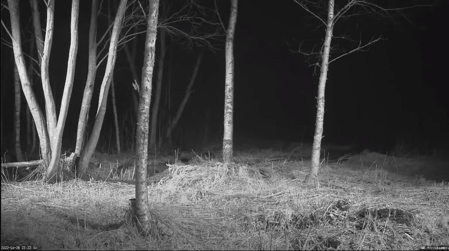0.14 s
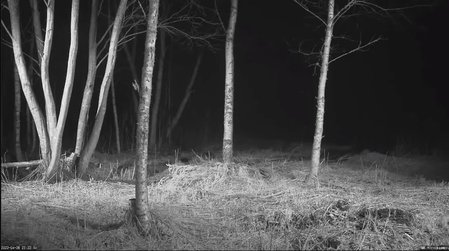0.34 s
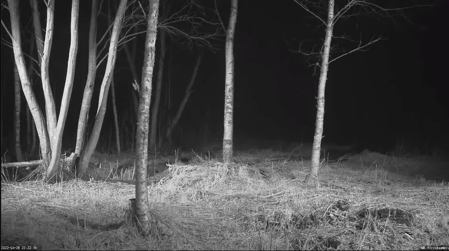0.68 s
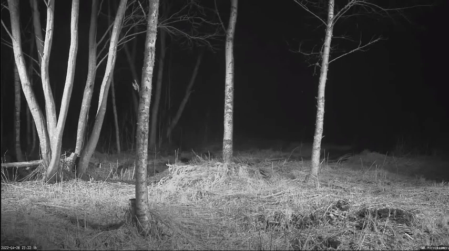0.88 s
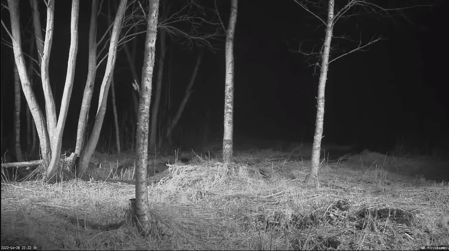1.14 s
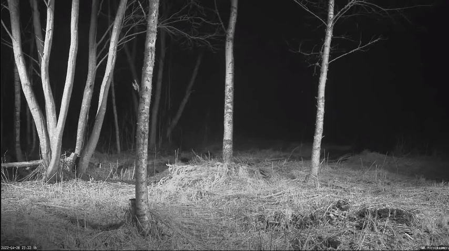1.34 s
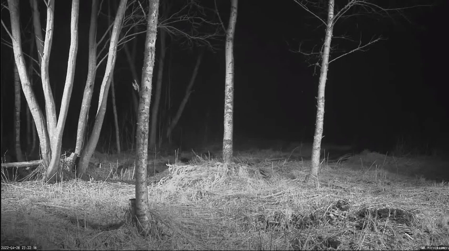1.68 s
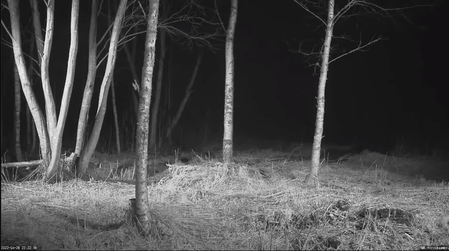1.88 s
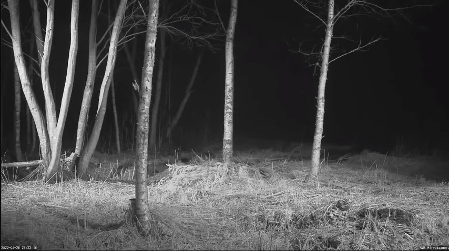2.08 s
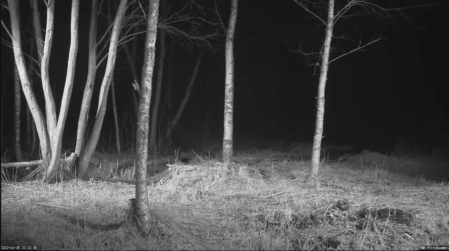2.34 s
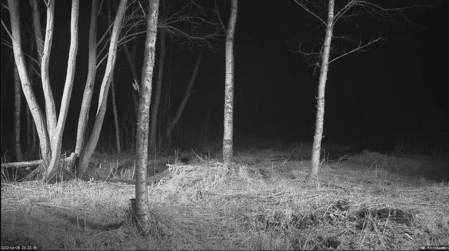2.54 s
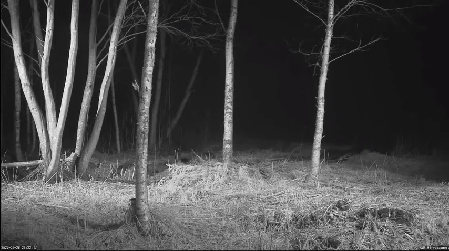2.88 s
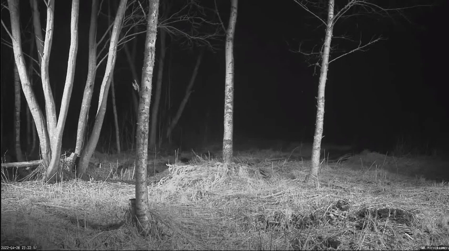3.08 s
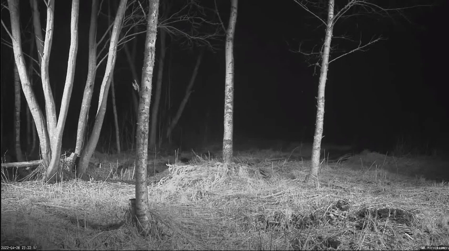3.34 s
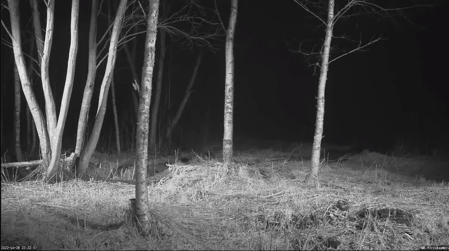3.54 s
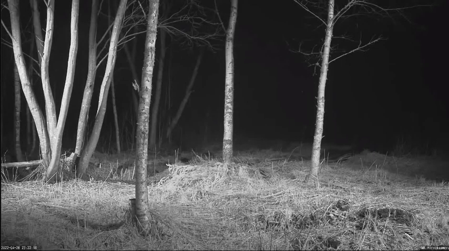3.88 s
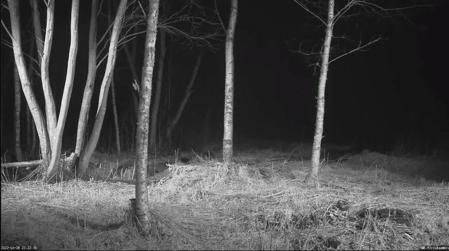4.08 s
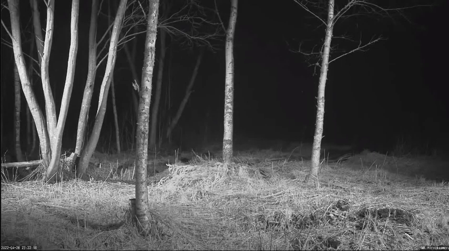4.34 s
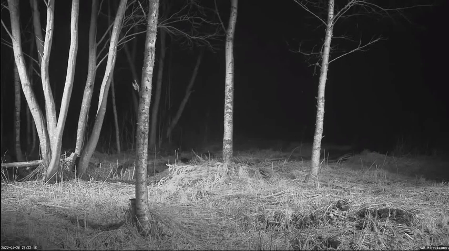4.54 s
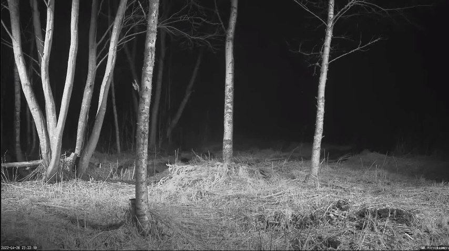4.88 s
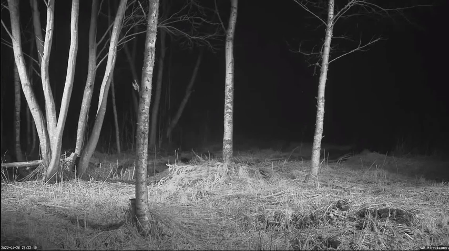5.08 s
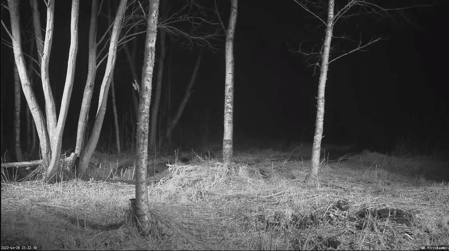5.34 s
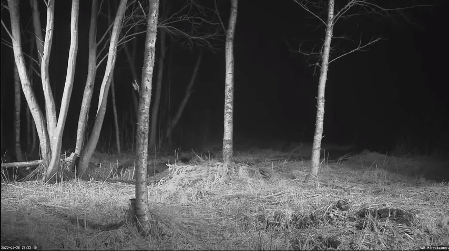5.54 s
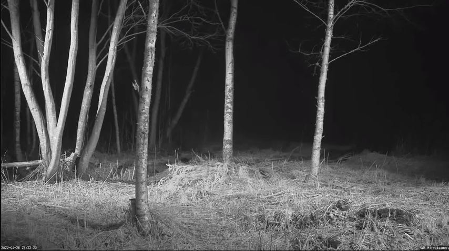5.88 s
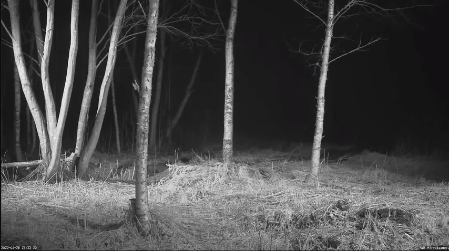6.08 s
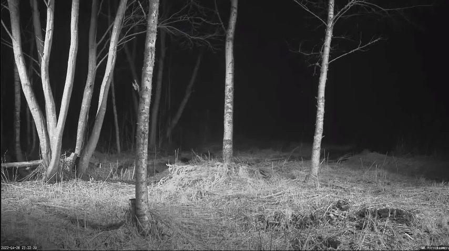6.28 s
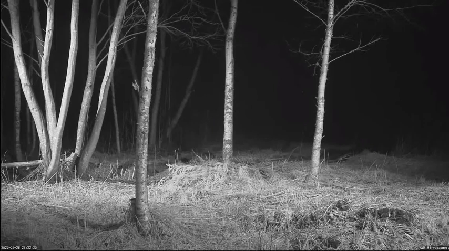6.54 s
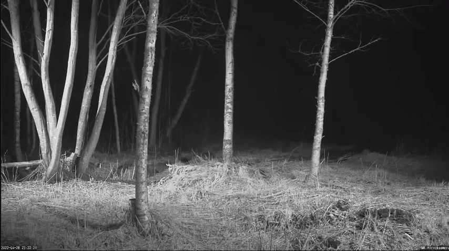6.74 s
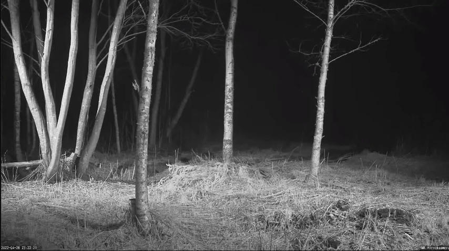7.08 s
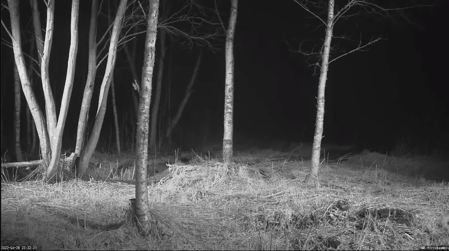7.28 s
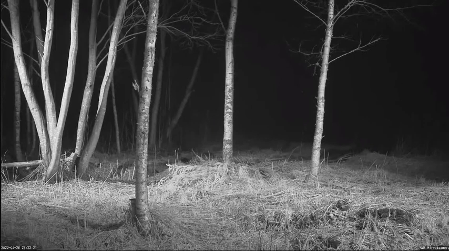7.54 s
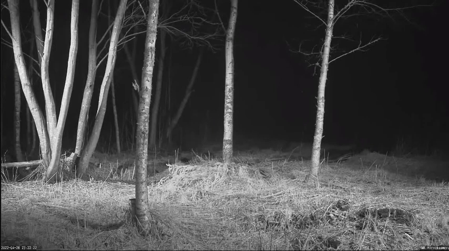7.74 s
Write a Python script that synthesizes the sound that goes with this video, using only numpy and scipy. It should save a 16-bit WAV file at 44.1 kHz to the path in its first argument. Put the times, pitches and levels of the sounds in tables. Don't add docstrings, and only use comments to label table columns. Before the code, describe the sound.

A wolf pack yips, yelps and barks excitedly some way off in a night wood, calls ringing off the trunks over faint hiss.

```python
import sys
import numpy as np
from scipy import signal
from scipy.fft import rfft, irfft, next_fast_len
from scipy.io import wavfile
from scipy.ndimage import uniform_filter1d

SR = 44100
rng = np.random.default_rng(int(sys.argv[2]) if len(sys.argv) > 2 else 0)


def persist_wave(psi):
    counts = np.round(np.clip(psi, -1, 1) * 32767).astype(np.int16)
    wavfile.write(sys.argv[1], SR, np.atleast_2d(counts).T)


def makeup_ratio(level_db):
    decades = np.asarray(level_db, float) / 20
    return 10 ** decades


N = 348831

# frequency in Hz, density in dB per Hz.
HISS_SPECTRUM = [(20, 5), (60, -4.5), (150, -9.5), (300, -10.5), (1000, -26), (3500, -25.5), (7000, -30),
                 (15500, -33)]
HISS_DB = -59

# time in seconds, level in dB.
CHORUS_LEVEL = [(0.0, -32), (0.11, -35.5), (0.61, -40), (0.9, -42.5), (1.6, -39), (1.78, -34), (2.18, -39),
                (2.359, -41), (2.998, -40.5), (3.441, -35.5), (3.901, -32.5), (5.019, -36), (5.68, -35.5),
                (5.989, -37.5), (6.9, -40.5), (7.4, -43), (7.8, -39), (7.91, -35)]
# frequency in Hz, gain in dB.
CHORUS_COLOUR = [(180, -65), (300, -30), (490, -9.5), (710, -9), (830, -4.5), (1310, 6), (1610, 8),
                 (2010, -12.5), (2690, -41), (3300, -52), (4200, -52), (5200, -62), (7000, -80)]

# frequency in Hz, T60 in seconds.
WOOD_T60 = [(300, 7.25), (1000, 2.85), (1600, 0.66), (2600, 1.78), (3600, 1.1), (6000, 0.89)]
# frequency in Hz, gain in dB.
SHADE = [(2500, 0), (3100, -5), (4300, -10), (5400, -3)]
# delay in seconds, gain in dB.
ECHOES = [
    (.085, -20),
    (.16, -24.5),
    (.27, -24),
]
# frequency in Hz, gain in dB.
PATH_COLOUR = [(300, -29.5), (900, 4), (1400, 13), (2000, 1.5), (2600, -21.5), (3200, -19), (6000, -19.5)]
# frequency in Hz, gain in dB.
YAP_TREBLE = [(1900, 0), (2300, -7), (2700, -18), (3300, -12)]

# frequency in Hz, gain in dB.
THROAT = [(330, -9.5), (650, -22), (1300, 8), (1750, -16), (2300, -19), (2900, -27), (4100, -28),
          (5500, -56.5)]
# frequency in Hz, gain in dB.
YAP_THROAT = [(330, -38), (650, -16), (1000, -5), (1300, 0), (1750, -7), (2050, -17), (2400, -32),
              (5500, -50)]
# frequency in Hz, gain in dB.
MID_THROAT = [(400, -22), (700, -5), (1000, 0), (1700, -1), (2100, -8), (2400, -30), (3000, -46),
              (5500, -70)]
MOUTH_HZ, LOW_MOUTH_HZ = 1300, 1450
LOW_HZ, HIGH_HZ = 600, 1010
LOW_SOFT_DB, PRESSED_FIRST_DB, YAP_FIRST_DB = -.2, -20, -6.5
# frequency in Hz, gain in dB.
RASP = [(2400, -47), (3300, -12.5), (4200, 7.5), (5000, -8), (6500, -30)]

# time in seconds, pitch in Hz, level in dB.
EARLIER_HOWLS = [
    [(-.4, 760, -34), (-.2, 849, -33), (-.01, 798, -49)],
    [(-.45, 580, -49.5), (-.2, 630, -43), (-.01, 600, -55)],
]
# time in seconds, pitch in Hz, level in dB.
HOWL = [(2.932, 1533, -20), (2.999, 1501, -24), (3.018, 1450, -18.5), (3.036, 1269, -16),
        (3.085, 1205, -20.5), (3.131, 1118, -21), (3.215, 1105, -24), (3.268, 925, -33), (3.348, 867, -37)]
# time in seconds, pitch in Hz, level in dB.
CRIES = [
    [(1.44, 1299, -36.5), (1.478, 1290, -40.5), (1.495, 950, -44)],
    [(3.635, 1580, -23), (3.68, 1523, -24.5), (3.715, 1241, -19), (3.737, 871, -35), (3.775, 847, -35.5)],
    [(4.8, 1137, -50), (4.85, 1060, -34), (4.92, 1099, -30), (5.05, 1050, -44)],
    [(5.57, 1033, -35.5), (5.6, 1422, -21), (5.63, 1443, -16), (5.66, 1339, -24), (5.69, 1083, -31)],
    [(5.682, 874, -25.5), (5.75, 862.5, -35), (5.78, 767, -29)],
    [(6.535, 1137, -40.5), (6.57, 1252, -24.5), (6.64, 1255, -52.5)],
    [(7.349, 1830, -32), (7.36, 1326, -27.5), (7.375, 1103, -39.5), (7.42, 1139, -36)],
    [(7.775, 1310, -25.5), (7.83, 1440, -29), (7.88, 1474, -30), (7.93, 1353, -23)],
    [(.24, 800, -39), (.262, 835, -39.5), (.295, 740, -34.5), (.315, 650, -35)],
    [(6.945, 562.4, -36.5), (6.98, 661, -38.5), (7.01, 663, -29), (7.04, 603, -38)],
    [(7.03, 1297, -34), (7.1, 1354, -40), (7.33, 1293, -47)],
    [(2.02, 386, -40.5), (2.06, 412.7, -31), (2.1, 394, -36.5)],
    [(7.455, 783, -41.5), (7.475, 830, -38), (7.49, 1010, -34), (7.515, 780, -36)],
    [(3.72, 930, -31), (3.76, 876, -27), (3.8, 747, -29)],
    [(3.87, 829, -29), (3.895, 840, -24), (3.96, 703, -29)],
    [(5.436, 1510, -26.5), (5.455, 1379, -27.5), (5.54, 1369, -33.5)],
    [(-.05, 803, -36), (.06, 791, -35), (.19, 763, -35)],
]
# mouth resonance in Hz, softness of the folds in dB.
CRY_COLOURS = [(1600, -10), (1600, -2.5), (1300, -22), (1678, -5.5), (1300, -20), (1480, -9), (1450, -4.5),
               (1400, -4), (1450, -14), (1550, -2), (1450, -.9), (1300, -10), (1650, -.05), (1480, -10),
               (1700, -3), (1520, -6), (1350, -20), (1500, -3)]
# start in seconds, length in seconds, pitch in Hz,
# level in dB, mouth resonance in Hz.
YAPS = [(.11, 0.052, 411, -43, 1020), (.81, 0.075, 398.8, -39, 1060), (.94, 0.09, 420.8, -39, 1350),
        (1.079, 0.076, 392, -42, 1076), (1.301, 0.13, 423.3, -42.5, 1296), (1.776, 0.056, 415, -39, 1310),
        (2.042, 0.054, 538, -37.5, 1200), (2.735, 0.08, 289, -39, 1400), (2.835, 0.076, 265.3, -45, 1430),
        (3.804, 0.064, 431.5, -27, 1370), (4.18, 0.097, 447.7, -40, 1310),
        (4.298, 0.06, 437.7, -34.5, 1120), (4.368, .1, 469.4, -32, 1520), (6.47, .06, 514, -56, 1600),
        (6.152, 0.074, 483, -35, 1400), (6.3, 0.07, 403.4, -37, 1450), (6.37, 0.051, 467, -46, 1450),
        (6.591, 0.032, 611.7, -29.5, 1250), (7.57, 0.028, 578, -31.5, 1237),
        (7.79, 0.058, 580, -31.5, 1205)]
# start in seconds, length in seconds, foot in Hz, top in Hz, level in dB.
ARCHES = [
    (1.596, .078, 1018, 1295, -24.5),
    (1.81, .06, 1134, 1333, -22),
    (4.63, 0.066, 737, 763, -37),
    (5.316, .1, 903, 1050, -34),
    (5.459, 0.051, 892, 948.6, -29.5),
    (3.375, 0.068, 1087, 1263, -38),
    (5.05, 0.087, 439.8, 508.5, -29.5),
    (5.186, 0.095, 439, 539, -26),
    (6.726, 0.096, 415.5, 503.5, -37),
    (7.68, 0.079, 429.7, 506, -31),
]
# start in seconds, length in seconds, first Hz, last Hz, level in dB.
SLIDES = [(.212, 0.048, 1085, 960, -32), (1.41, 0.0915, 689, 640.5, -38.5), (1.232, .048, 765, 650, -44.5),
          (1.232, .048, 1530, 1300, -35), (1.28, 0.037, 978, 958, -45), (1.68, 0.068, 998, 1005, -40),
          (2.3, 0.076, 1069, 1200, -48), (3.28, 0.035, 1002, 897, -33.5), (3.5, 0.022, 1143, 1087, -25),
          (3.6, 0.044, 990, 930, -32.5), (4.73, .07, 790, 770, -39), (1.785, .04, 1260, 1150, -30.5),
          (5.7, 0.0846, 1290, 1470, -27), (.32, .09, 765, 755, -37.5), (5.89, 0.032, 1446, 1700, -37.5),
          (6.815, 0.056, 640, 470, -35), (7.04, 0.04, 880, 700, -34.5), (7.025, 0.024, 1218, 803, -33.5),
          (6.48, .055, 2050, 1550, -47), (6.4, .04, 2250, 2150, -50), (6.6, .04, 2340, 1900, -47),
          (7.565, .06, 1300, 1021, -29), (7.638, .045, 1495, 1213, -26)]
# start in seconds, length in seconds, first Hz, last Hz,
# level in dB.
SWELLS = [
    (4.96, 0.043, 882, 793, -28),
    (5.09, 0.036, 1540, 1482, -24.5),
]
# start in seconds, length in seconds, first Hz, last Hz,
# level in dB.
HOOTS = [
    (1.479, 0.1, 710, 660, -44),
    (3.38, 0.064, 690, 597, -35),
    (3.92, 0.16, 342.6, 325, -45.5),
    (.81, 0.27, 384.7, 404.4, -47.5),
    (4.06, .07, 663, 632, -37),
    (.46, .13, 830, 815, -39.5),
    (4.6, .2, 430, 420, -50),
    (5.1, .1, 440, 490, -45),
]
# start in seconds, length in seconds,
# first Hz, last Hz, level in dB.
WHINES = [(.12, .16, 4650, 4750, -71), (1.08, .18, 5020, 5250, -66), (2.5, .08, 3650, 3640, -64),
          (2.85, .1, 5620, 5560, -60), (2.94, .12, 6100, 5770, -66), (3.59, .04, 5350, 5900, -64),
          (3.625, .055, 5930, 5450, -63), (3.71, .06, 4950, 4950, -65), (6.32, .05, 4050, 4000, -67),
          (7.336, .026, 4050, 3900, -55), (3.22, .1, 3040, 3020, -62), (5.21, .09, 3760, 3780, -66),
          (5.6, .19, 4180, 4360, -63), (6.32, .04, 3230, 3220, -65), (7.84, .07, 4340, 4380, -64),
          (4.35, .1, 4150, 4350, -69), (4.82, .12, 4300, 4250, -69), (6.98, .09, 3280, 3260, -64),
          (.258, .042, 2520, 2200, -50), (1.825, .04, 3960, 3940, -57), (3.69, .035, 2800, 2200, -47),
          (5.655, .035, 2700, 2080, -45)]
# start in seconds, level in dB, length in seconds, mouth resonance in Hz.
BARKS = [(0.28, -60, 0.14, 1490), (1.464, -48, 0.078, 1667), (1.81, -32.5, 0.08, 1550),
         (2.055, -39, 0.04, 1723), (3.339, -33, 0.11, 1300), (3.7, -31, 0.24, 1500),
         (3.894, -31, 0.12, 1650), (6.173, -41.5, 0.025, 1520), (6.379, -46, 0.14, 1570),
         (6.588, -44, 0.067, 1600), (6.796, -35, .08, 1400), (7.344, -32.5, 0.043, 1505),
         (7.448, -39, 0.14, 1480)]
# start in seconds, length in seconds, first Hz,
# last Hz, level in dB.
TURNED = [(5.64, 0.039, 2850, 2250, -43.5), (6.1, 0.046, 2230, 2570, -48.5), (6.95, 0.086, 2150, 2800, -42),
          (7.34, .06, 3260, 2875, -58), (7.56, .06, 3420, 3500, -60.5), (7.79, 0.088, 2635, 2950, -46),
          (5.34, 0.051, 3080, 3050, -58), (3.68, 0.04, 2900, 2100, -44.5), (6.96, 0.074, 2640, 2680, -46),
          (5.2, 0.054, 2700, 2690, -55), (5.22, 0.063, 3060, 2800, -59.5), (6.1, .05, 4400, 4400, -59.5),
          (6.4, 0.053, 4300, 3500, -59), (5.58, 0.062, 2800, 2900, -55.5)]

# start in dB, place of the peak 0-1, end in dB.
YAP_EFFORT, ARCH_EFFORT, SLIDE_EFFORT = (-8, .55, -4), (-15.5, 0.64, -14.5), (-4, 0.17, -2.8)
SWELL_EFFORT, HOOT_EFFORT, WHINE_EFFORT = (-12, 0.95, -1), (-1.5, 0.29, -14.5), (-1, .45, -10)
ARCH_COLOUR, HOOT_COLOUR = (1600, -2.2), (1014, -0.88)
SLIDE_COLOUR, SWELL_COLOUR = (1450, -14), (1300, -13)
YAP_FOOT = .93
ARCH_FLAT = .6


def read(points, hz):
    point_hz, value = np.transpose(points)
    return np.interp(np.log(hz + 1), np.log(point_hz + 1), value)


def evened(x):
    return x / np.sqrt(np.mean(x ** 2) + 1e-20)


def coloured(x, points):
    size = next_fast_len(len(x))
    gain = makeup_ratio(read(points, np.fft.rfftfreq(size, 1 / SR)))
    return irfft(rfft(x, size) * gain, size)[:len(x)]


def add(mix, start_s, sound):
    part = mix[round(start_s * SR):][:len(sound)]
    part += sound[:len(part)]


def hiss():
    return makeup_ratio(HISS_DB) * evened(coloured(rng.standard_normal(N), HISS_SPECTRUM))


def wood(x, build_s=0.021):
    size = 2 * SR
    taps = np.zeros(size)
    at = np.arange(0, size - 20, 20)
    taps[at + rng.integers(0, 20, len(at))] = rng.choice([-1., 1.], len(at))
    hz, t, bands = signal.stft(taps, SR, nperseg=256)
    decay = makeup_ratio(-60 * t / read(WOOD_T60, hz)[:, None])
    tail = signal.istft(bands * decay, SR, nperseg=256)[1][:size]
    tail = tail * (1 - np.exp(-(np.arange(size) / SR / build_s) ** 2))
    return signal.fftconvolve(x, tail / np.linalg.norm(tail))[:len(x)]


def voice(rows, partials_db, jitter=0.011, rise_s=0.007, fall_s=0.0043):
    s, hz, db = np.transpose(rows)
    partials_db = np.atleast_1d(partials_db)
    t = np.arange(s[0], s[-1], 1 / SR)
    wobble = evened(uniform_filter1d(rng.standard_normal(SR // 2)[:len(t)], size=150))
    pitch_hz = uniform_filter1d(np.interp(t, s, hz), size=400, mode="nearest")
    turns = np.cumsum(pitch_hz * (1 + jitter * wobble)) / SR
    multiple = np.arange(1, len(partials_db) + 1)[:, None]
    glide_db = read(PATH_COLOUR, multiple * pitch_hz) - read(PATH_COLOUR, multiple * pitch_hz.mean())
    glide_db = glide_db - glide_db[np.argmax(partials_db)]
    partials = makeup_ratio(partials_db[:, None] + glide_db) * np.sin(2 * np.pi * multiple * turns)
    tone = partials.sum(0)
    edges = np.clip(np.minimum((t - s[0]) / rise_s, (s[-1] - t) / fall_s), 0, 1)
    level = np.sqrt(2) * makeup_ratio(np.interp(t, s, db))
    return s[0], level * tone * np.sin(np.pi / 2 * edges) ** 2


def far_pack(count=300, low_hz=300, high_hz=1000):
    lead = SR
    dry = np.zeros(N + lead)
    for when, height, length, arch, end, loud in rng.random((count, 6)):
        s = when * len(dry) / SR
        hz = low_hz * (high_hz / low_hz) ** height
        db = 6.0 * loud
        rows = [(s, hz, db),
                (s + 0.02365 + 0.0526 * length, hz * (1 + .2 * arch), db),
                (s + 0.055 + .11 * length, hz * (1.05 - 0.32 * end), db)]
        add(dry, *voice(rows, np.zeros(8), jitter=0.017, rise_s=0.013, fall_s=0.033))
    dry_db = -5
    blur = coloured(wood(dry) + makeup_ratio(dry_db) * dry, CHORUS_COLOUR)[lead:]
    blur = blur / np.sqrt(uniform_filter1d(blur ** 2, size=SR // 3))
    s, db = np.transpose(CHORUS_LEVEL)
    return blur * makeup_ratio(np.interp(np.arange(N) / SR, s, db))


def bark(start_s, db, length_s, mouth_hz, pulse_hz=520):
    t = np.arange(round(length_s * SR)) / SR
    pulses = 0.21 + np.exp(-(pulse_hz * t % 1) / 0.17)
    puffs = rng.standard_normal(SR // 4)[:len(t)] * pulses
    low_side = [(.3 * mouth_hz, -45), (.6 * mouth_hz, -8), (mouth_hz, 0)]
    high_side = [(1.5 * mouth_hz, -20), (2.1 * mouth_hz, -44), (2.8 * mouth_hz, -40), (4 * mouth_hz, -75)]
    return start_s, makeup_ratio(db) * evened(coloured(puffs, low_side + high_side)) * np.hanning(len(t))


def shaped(start_s, length_s, first_hz, second_hz, db, effort, arched=False):
    start_db, peak_at, end_db = effort
    u = np.linspace(0, 1, num=13)
    bend = abs(np.sin(np.pi * u)) ** ARCH_FLAT if arched else u
    level_db = db + np.interp(u, [0, np.clip(peak_at, .02, .98), 1], [start_db, 0, end_db])
    return np.transpose([start_s + length_s * u, first_hz + (second_hz - first_hz) * bend, level_db])


def through_mouth(rows, throat, mouth_hz=MOUTH_HZ, soft_db=0, yap=False):
    pitch_hz = np.mean(np.transpose(rows)[1])
    hz = np.arange(pitch_hz, 4400, pitch_hz)
    order = np.arange(len(hz))
    partials_db = read(throat, hz * MOUTH_HZ / mouth_hz) + soft_db * order ** 2
    if pitch_hz < LOW_HZ and throat is THROAT and soft_db > LOW_SOFT_DB:
        partials_db = partials_db + PRESSED_FIRST_DB * (order == 0)
    if yap:
        partials_db = partials_db + YAP_FIRST_DB * (order == 0) + read(YAP_TREBLE, hz)
    return voice(rows, partials_db - partials_db.max())


def low_yap(start_s, length_s, hz, db, mouth_hz):
    rows = shaped(start_s, length_s, YAP_FOOT * hz, hz, db, YAP_EFFORT, arched=True)
    return through_mouth(rows, YAP_THROAT, mouth_hz, yap=True)


def yip(rows, colour):
    pitch_hz = np.mean(rows[:, 1])
    if pitch_hz < LOW_HZ:
        return through_mouth(rows, YAP_THROAT, LOW_MOUTH_HZ, yap=True)
    if pitch_hz < HIGH_HZ:
        return through_mouth(rows, MID_THROAT)
    return through_mouth(rows, THROAT, *colour)


def near_calls():
    calls = [through_mouth(rows, THROAT, *colour) for rows, colour in zip([HOWL] + CRIES, CRY_COLOURS)]
    calls += [low_yap(*row) for row in YAPS]
    calls += [yip(shaped(*row, ARCH_EFFORT, arched=True), ARCH_COLOUR) for row in ARCHES]
    calls += [yip(shaped(*row, SLIDE_EFFORT), SLIDE_COLOUR) for row in SLIDES]
    calls += [yip(shaped(*row, SWELL_EFFORT), SWELL_COLOUR) for row in SWELLS]
    calls += [through_mouth(shaped(*row, HOOT_EFFORT), THROAT, *HOOT_COLOUR) for row in HOOTS]
    calls += [voice(shaped(*row, WHINE_EFFORT), [0], jitter=0.0046) for row in WHINES]
    calls += [bark(*row) for row in BARKS]
    calls += [voice(rows, [0, -4, -30]) for rows in EARLIER_HOWLS]
    return calls


def near_pack(wet_db=-5.5, rasp_db=-41):
    lead = SR // 2
    dry = np.zeros(N + 2 * lead)
    for s, sound in near_calls():
        add(dry, s + lead / SR, sound)
    effort = np.sqrt(abs(uniform_filter1d(dry ** 2, size=800)))
    dry = dry + makeup_ratio(rasp_db) * effort * evened(coloured(rng.standard_normal(len(dry)), RASP))
    straight = coloured(dry, SHADE)
    for row in TURNED:
        s, sound = voice(shaped(*row, WHINE_EFFORT), [0])
        add(dry, s + lead / SR, sound)
    heard = straight + makeup_ratio(wet_db) * wood(dry)
    for delay_s, echo_db in ECHOES:
        add(heard, delay_s, makeup_ratio(echo_db) * straight)
    return heard[lead:lead + N]


def scene():
    return (far_pack() + hiss() + near_pack())[None]


def top_cut(x):
    return signal.sosfilt(signal.butter(12, 15720, fs=SR, output="sos"), x)


def record(dry):
    fade_s = .006
    edge = np.minimum(np.arange(N) / (fade_s * SR), 1)
    return top_cut(dry * edge * edge[::-1])


dry = scene()
out = record(dry)
persist_wave(out)
```